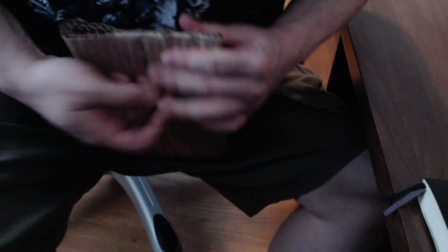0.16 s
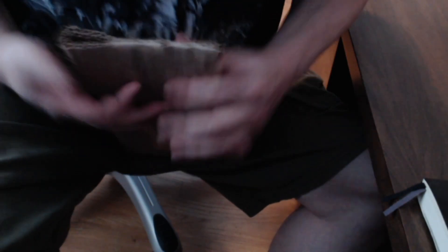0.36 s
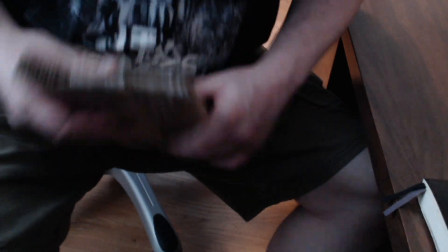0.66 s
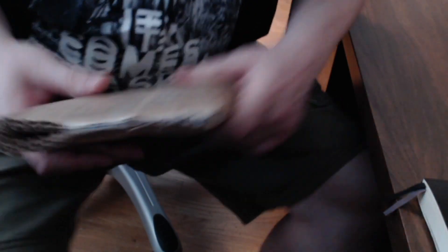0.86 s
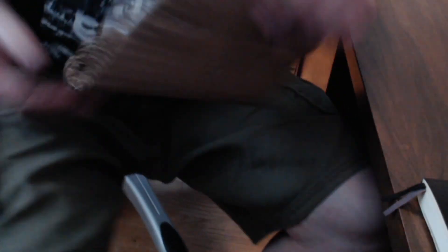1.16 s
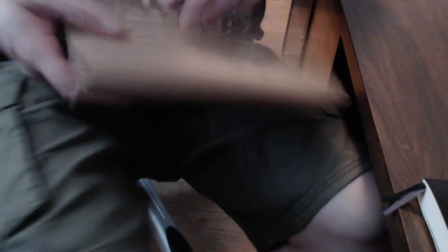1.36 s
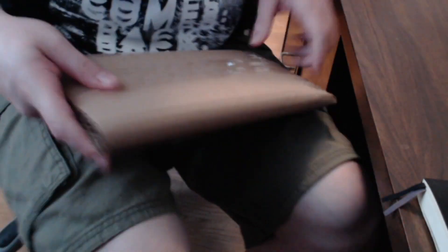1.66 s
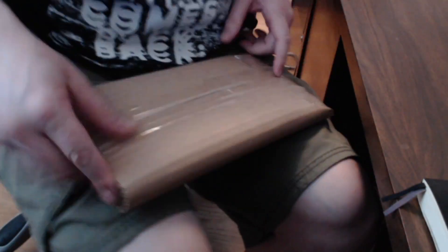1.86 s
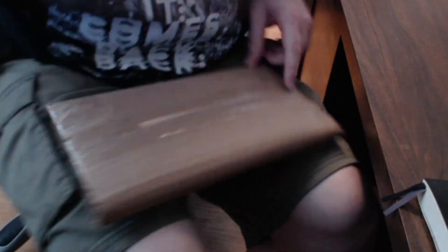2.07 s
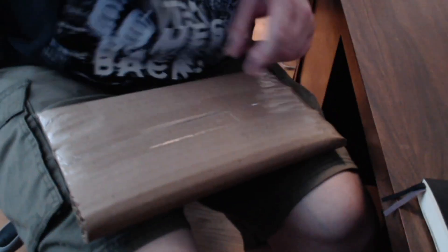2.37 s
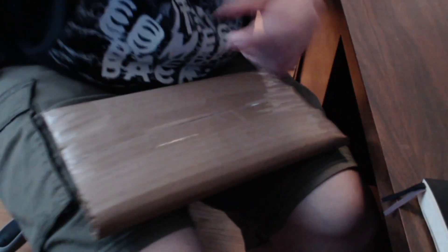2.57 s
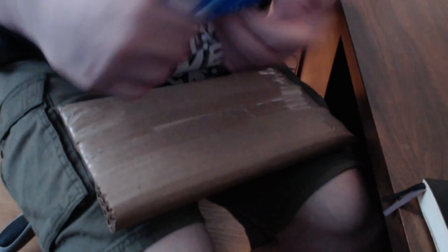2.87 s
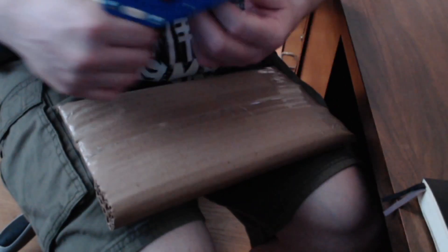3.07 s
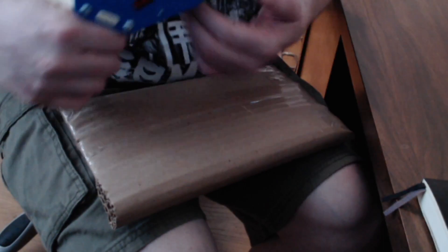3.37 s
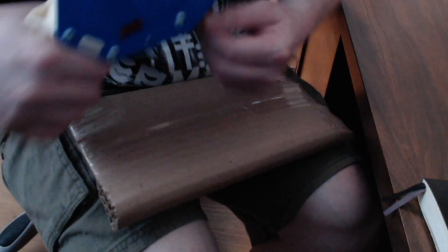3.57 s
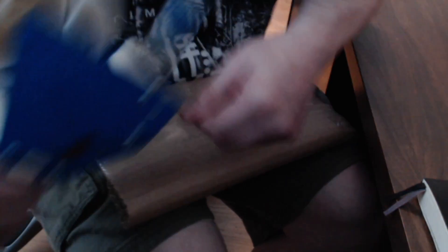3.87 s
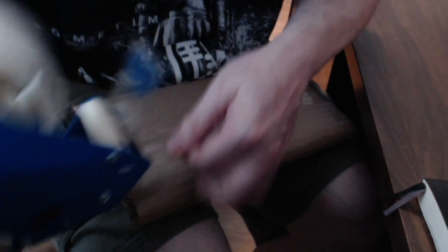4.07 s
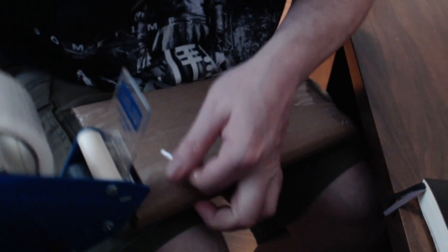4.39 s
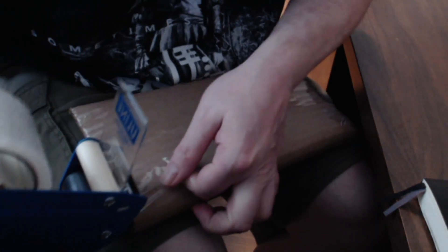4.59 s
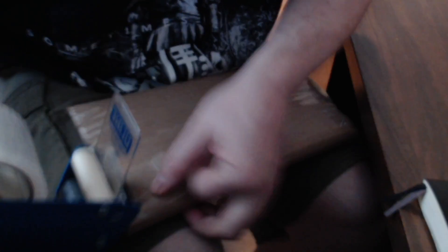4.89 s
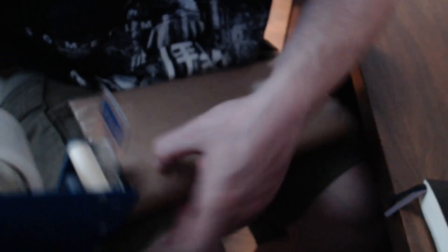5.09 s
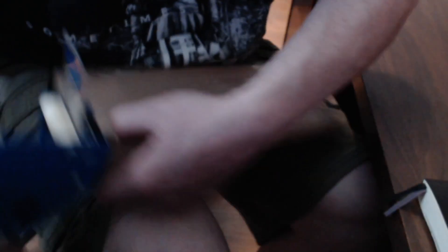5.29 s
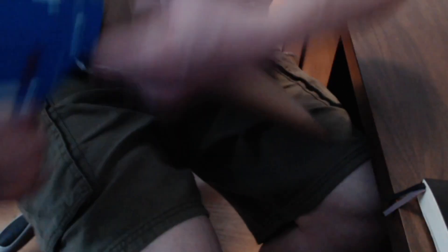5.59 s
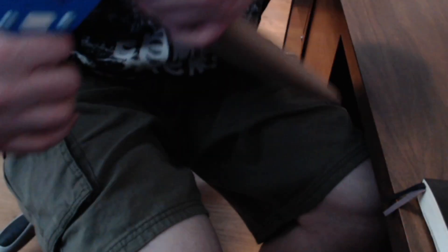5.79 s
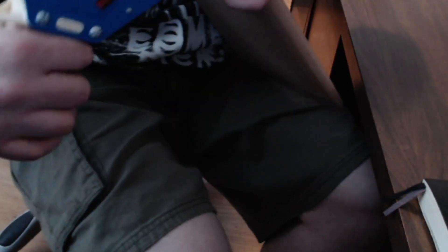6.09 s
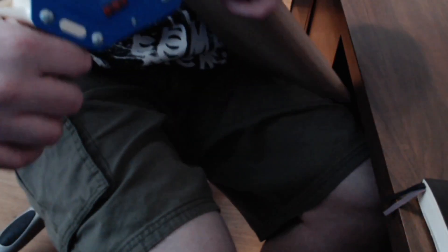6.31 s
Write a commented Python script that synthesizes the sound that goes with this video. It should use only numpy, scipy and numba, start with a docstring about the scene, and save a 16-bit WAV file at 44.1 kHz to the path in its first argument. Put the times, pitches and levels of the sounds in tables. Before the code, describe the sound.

Close indoor handling of corrugated card over a soft fan hum, with small plastic clicks, two harsh short tape pulls and a sharp metallic snap between.

```python
"""Packing tape is pulled twice off a tape gun, after a flat cardboard parcel is turned over on a lap.
The tape jerks loose (noise bursts) and screeches as fast, uneven slips ring the tape and gun.
After the first pull the tape snaps on the blade, where a blow rings the metal and the handle.
Hands rub (tiny clicks) and bump (soft pushes) the card, small parts click, and a fan hums (noise and tones).
The room adds echoes, and the close stereo microphone overloads."""
import sys
import numpy as np
from scipy import signal
from scipy.fft import rfft, irfft
from scipy.io import wavfile
from numba import njit

SR = 44100
rng = np.random.default_rng(int(sys.argv[2]) if len(sys.argv) > 2 else 0)


def to_wav(s):
    """Save 16-bit WAV."""
    ch = np.atleast_2d(s).T  # columns
    pcm = np.round(np.clip(ch, -1, 1) * 32767)  # PCM
    wavfile.write(sys.argv[1], SR, pcm.astype(np.int16))


N = 284445
T = np.arange(N) / SR  # time in seconds

# All levels in the tables are relative: the functions that use them also set overall levels.
# Airy noise of the fan. Each row: frequency in Hz, level in dB.
FAN_AIR = [(20, -28), (50, -10.5), (80, -10.5), (125, -7), (200, -1), (300, -7), (400, -9), (640, -14),
           (950, -17.5), (1600, -21), (3200, -28.5), (6000, -34), (10000, -41), (16000, -45)]
# Steady tones of the fan. Each row: frequency in Hz, level in dB.
FAN_TONES = [(120, -49.5), (179.5, -53), (314.3, -40.5), (360, -57), (629, -46), (943, -55.5)]
# Hands and cloth slide over the card. Each row: firmest moment in seconds, hiss in dB, scrape in dB,
# swelling time in seconds, fading time in seconds.
CARD_RUBS = [(.25, -32, -44.5, 0.12, 0.09), (.33, -25.5, -34.5, 0.02, 0.062),
             (.523, -39, -34.5, 0.012, 0.029), (.62, -38.5, -41.5, 0.055, 0.055),
             (.745, -39.5, -47, 0.011, 0.073), (.872, -42, -34.5, 0.042, 0.013),
             (1.23, -37, -38.5, 0.073, 0.13), (1.31, -40, -38, 0.04, .04),
             (1.45, -40.5, -41.5, 0.096, 0.084), (1.67, -33, -34, 0.048, 0.04),
             (1.82, -31, -34.5, 0.03, 0.022), (2.01, -40.5, -41, 0.057, 0.083), (4.22, -50, -45, .03, 0.11),
             (4.88, -33, -37, 0.041, 0.027), (4.97, -39.5, -38, 0.04, 0.14), (5.13, -40, -43, 0.081, 0.13),
             (5.201, -35, -30, 0.011, 0.04), (5.317, -40, -40, 0.0073, 0.032),
             (5.43, -40.5, -40, 0.11, 0.2)]
# Fingers work at the sticky film. Each row: the same columns as CARD_RUBS.
FILM_RUBS = [(2.745, -54, -41.5, 0.067, 0.041), (2.855, -40, -31.5, 0.0025, 0.051),
             (2.99, -42, -42, 0.0044, 0.071), (3.183, -26.5, -27, 0.051, 0.03),
             (3.416, -41, -36, 0.0022, 0.0077), (3.495, -43.5, -38, 0.032, 0.023),
             (3.632, -39.5, -37.5, 0.0099, 0.018), (3.72, -31.5, -35, 0.0041, 0.0064),
             (3.99, -37, -29, .025, 0.033), (4.03, -31.5, -34, .005, 0.039),
             (4.738, -50, -41.5, .002, 0.066), (4.817, -35, -34, 0.019, 0.0037),
             (6.085, -36.5, -26, 0.015, 0.032)]
# Bright part of rubbing, clicks and snaps. Each row: frequency in Hz, level in dB.
HISS_COLOUR = [(1200, -14), (2500, -1), (4500, 4.5), (7000, 3), (10500, 4), (13000, -5), (16000, -10)]
# Duller part of rubbing and clicks. Each row: frequency in Hz, level in dB.
SCRAPE_COLOUR = [(250, -12), (600, 2), (1000, 4.5), (2000, 2.5), (3800, 0.5), (6000, -4), (10000, -22.5)]
# The parcel is swung round. Each row: middle in seconds, time from there to 37 % in seconds, level in dB.
PARCEL_SWINGS = [(1.162, 0.17, -36.5), (5.2, .05, -47)]
# The parcel is bumped. Each row: start in seconds, level in dB, crunch in dB, boom in dB,
# left minus right in dB.
PARCEL_BUMPS = [(1.279, -24, -1, -10, 2), (1.309, -20, -9, -8, -1), (2.336, -25, -8.5, 6, -6),
                (2.391, -32.5, 5, -7, 7), (2.403, -8, -7.5, -6, -9.5), (2.42, -9.5, -6, -13, 0),
                (5.1121, -20.5, -2, -6, 0), (5.166, -32, 2, 0, 1)]
# Resonances of the parcel on the lap. Each row: frequency in Hz, width in Hz, level in dB.
PARCEL_RINGS = [(146.5, 10, 18.5), (183, 14, 2), (234, 13, 2), (283, 4.7, 12), (494, 60, -3),
                (586, 51, -11), (775, 54, -3)]
# Crunch of the crushed flutes. Each row: frequency in Hz, level in dB.
CRUNCH_COLOUR = [(240, -18), (450, 2.5), (1000, -8.5), (1350, -4), (1800, -7.5), (3000, -9.5), (4500, -18),
                 (6000, -27), (14000, -35.5)]
# Small clicks of film and plastic. Each row: start in seconds, level in dB, ring in Hz, treble in dB.
SMALL_CLICKS = [(1.3092, -22, 1620, -2), (1.337, -18.5, 3600, 7), (2.332, -28.5, 3160, -28),
                (2.4221, -12, 2840, -18), (2.7327, -23.5, 1600, -22), (2.75, -31.5, 2940, -20),
                (2.7647, -26, 2720, -25), (2.7953, -31.5, 2800, -20), (2.8285, -23.5, 2860, -32),
                (2.8543, -17.5, 4350, 8), (2.8763, -24, 2920, -21), (2.905, -23.5, 2050, 4),
                (2.9893, -23.5, 4400, -3), (3.127, -21, 1730, -19), (3.1507, -30, 1500, -1),
                (3.188, -16, 3600, -18), (3.242, -25, 3250, -3), (3.4145, -32, 2130, 5),
                (3.466, -31, 2540, 2), (3.493, -28.5, 2250, 5), (3.7153, -33, 1513, -15),
                (4.031, -17.5, 1620, 4), (4.0958, -27, 3500, -23), (4.188, -31, 1740, 20),
                (4.7016, -33.5, 3750, -32), (5.2003, -23, 3900, -18), (5.2492, -26, 2070, 0),
                (5.3125, -28, 1990, 9), (6.092, -28, 1500, -17)]
# The glue gives way in single jerks. Each row: start in seconds, level in dB, fading time in seconds,
# ring of the free tape in Hz.
TAPE_JERKS = [(3.7631, -6.5, 0.01, 2100), (3.7658, 5.5, 0.0013, 2120), (3.778, -2, 0.0064, 2090),
              (3.7934, -8, 0.0064, 2140), (5.7579, -8, 0.0084, 2510), (5.771, 5.5, 0.0042, 2450),
              (5.802, 9, 0.0032, 2700), (5.954, -3.5, 0.0084, 2130)]
# Resonances of the tape gun frame. Each row: frequency in Hz, width in Hz, level in dB.
GUN_RINGS = [(462, 37, -2), (793, 160, -7), (955, 91, -8), (1290, 560, -6.5), (1358, 78, -10),
             (1698, 440, -3), (1930, 210, -8), (3640, 1230, -6.5)]
# Crackle of the parting glue. Each row: frequency in Hz, level in dB.
GLUE_COLOUR = [(60, -8), (180, 8.5), (320, -28), (1200, 3), (2700, -15), (3200, -4.5), (4000, -3.5),
               (7000, -6.5), (10500, 2.5), (13000, -3), (16000, -36)]
# The arm draws tape off the roll. Each row: start in seconds, length in seconds, fastest moment in seconds
# after the start, speeding-up time in seconds, slowing-down time in seconds, top slips per second,
# level in dB, ring of the free tape at the start in Hz, ring of the roll in Hz, boom of the roll in dB,
# share of the tape drawn (0 to 1) when it booms most.
TAPE_PULLS = [(3.803, 0.18, .036, .12, .068, 850, 1, 2206, 324, -7.5, 0.61),
              (5.773, .191, .09, .12, .13, 880, 1.5, 2630, 470, 0, 0.73)]
# The taut tape breaks on the blade and the gun springs back. Each row: start in seconds, level in dB,
# main ring in Hz, handle in dB, bright crack in dB.
TAPE_SNAPS = [(4.8276, -4, 3740, -8.5, 3), (4.8308, -10.5, 5500, -29, 7), (4.9903, -5, 3250, -1, -11.5)]
# Resonances of the blade and guard. Each row: frequency in Hz, width in Hz, level in dB.
BLADE_RINGS = [(1320, 160, 12), (1850, 350, 11), (2270, 190, 0), (3080, 200, -9), (3740, 180, 5)]
# How sound dies away in the room. Each row: lowest frequency in Hz, highest frequency in Hz,
# time to fall by 60 dB in seconds, level in dB.
ROOM_BANDS = [(38.6, 330, 0.43, -2), (370, 1970, 0.26, 3.5), (1400, 4840, 0.31, -1.5),
              (4840, 8850, 0.26, 4.5), (9000, 21600, 0.23, 0)]


def amp(db):
    """Turn decibels into a gain."""
    return 10 ** (np.asarray(db) / 20)


def unit(x):
    """Scale to an average strength (rms) of 1."""
    return x / np.sqrt(np.mean(x ** 2) + 1e-18)


def noise():
    """White noise over the whole scene."""
    return rng.standard_normal(N)


def walk(rate):
    """Random values, rate of them a second, joined by straight lines."""
    return np.interp(T * rate, np.arange(N), noise())


def pan(db):
    """Left and right gains; db is left minus right."""
    return amp(np.array([[db], [-db]]) / 2)


def colour(x, points):
    """Filter through (Hz, dB) points without sounding early; white noise keeps its power."""
    hz, db = np.transpose(points)
    size = 4096
    bins_hz = np.arange(size + 1) * SR / (2 * size)
    gain = unit(amp(np.interp(np.log(bins_hz + 1), np.log(hz), db)))
    # folding the cepstrum makes the filter respond as early as it can
    cepstrum = irfft(np.log(gain))
    cepstrum[1:size] *= 2
    cepstrum[size + 1:] = 0
    response = irfft(np.exp(rfft(cepstrum)))
    return signal.fftconvolve(x, response)[:len(x)]


@njit
def svf(x, hz, width):
    """Let through a band around a centre that may move; the gain there is 1."""
    y, band, low = np.empty(len(x)), 0., 0.
    for i in range(len(x)):
        g, k = np.tan(np.pi * hz[i] / SR), width / hz[i]
        v = (band + g * (x[i] + 1e-18 - low)) / (1 + g * (g + k))
        band, low, y[i] = 2 * v - band, low + 2 * g * v, k * v
    return y


def ring(x, modes):
    """Ring resonances (Hz, width in Hz, dB) side by side; white noise keeps its power."""
    power = sum(amp(db) ** 2 * np.pi * width / SR for _, width, db in modes)
    total = sum(amp(db) * svf(x, hz + np.zeros(len(x)), float(width)) for hz, width, db in modes)
    return total / np.sqrt(power)


def burst(length, size=16384):
    """Noise that starts at once and falls to 37 % in length seconds."""
    return rng.standard_normal(size) * np.exp(-T[:size] / length)


def add(out, s, x):
    """Mix x into out from time s."""
    i = int(s * SR)
    out[..., i:i + x.shape[-1]] += x[..., :N - i]


def fan(air_db=-39, pan_db=-2.0, side_db=0, side_top_hz=3500):
    """Airy fan noise with slightly wavering tones, a little to the right, wider in its low part."""
    mid = unit(colour(noise(), FAN_AIR))
    low_pass = signal.butter(2, side_top_hz, fs=SR, output="sos")
    side = signal.sosfilt(low_pass, unit(colour(noise(), FAN_AIR)))
    air = amp(air_db) * (mid + amp(side_db) * side * np.array([[1], [-1]]))
    hum = np.zeros(N)
    for hz, db in FAN_TONES:
        level = amp(db + .6 * walk(6))
        cycles = np.cumsum(hz * (1 + .002 * walk(5))) / SR
        hum += level * np.sin(2 * np.pi * cycles)
    return (air + hum) * pan(pan_db)


def rubbing(strokes, grain_rate, scatter_db, smooth_db, hiss_db, scrape_db):
    """A surface catches and lets go in tiny clicks that hiss and scrape, swelling and fading each stroke."""
    shape = 0.99  # 1 = pressure builds and fades exponentially, 2 = as a bell
    hiss_power, scrape_power = np.zeros(N), np.zeros(N)
    for s, high_db, low_db, attack, release in strokes:
        distance = np.abs(T - s) / np.where(T < s, attack, release)
        pressure = np.exp(-np.minimum(distance, 20) ** shape)
        hiss_power += (amp(high_db) * pressure) ** 2
        scrape_power += (amp(low_db) * pressure) ** 2
    sizes = amp(scatter_db * np.minimum(rng.exponential(size=N), 5))
    catches = rng.random(N) < grain_rate / SR  # grain_rate clicks a second on average
    grains = unit(catches * sizes * np.sign(noise()))
    friction = unit(grains + amp(smooth_db) * noise())
    hiss = colour(friction * np.sqrt(hiss_power), HISS_COLOUR)
    scrape = colour(friction * np.sqrt(scrape_power), SCRAPE_COLOUR)
    return amp(hiss_db) * hiss + amp(scrape_db) * scrape


def sway(centre_hz=57, width_hz=24, pan_db=-5, apart_db=1):
    """Air pushed by the broad parcel rumbles, a little differently at each microphone port."""
    motion = sum(amp(db) * np.exp(-((T - s) / half) ** 2) for s, half, db in PARCEL_SWINGS)
    mode = [(centre_hz, width_hz, 0)]
    shared, left, right = (unit(ring(ring(noise(), mode), mode)) for _ in range(3))
    rumble = unit(shared + amp(apart_db) * np.array([left, right]))
    return motion * rumble * pan(pan_db)


def bumps(thud_db=26, boom_db=22, boom_hz=53, boom_width_hz=3.4):
    """A soft push rings the parcel and sets off a deep boom while the flutes crunch."""
    out = np.zeros((2, N))
    push_s, crunch_s = .0011, .011  # fading times
    for s, db, crunch_db, deep_db, pan_db in PARCEL_BUMPS:
        crunch = amp(crunch_db) * colour(burst(crunch_s), CRUNCH_COLOUR)
        push = np.exp(-T[:len(crunch)] / push_s) / (push_s * SR)
        thud = amp(thud_db) * ring(push, PARCEL_RINGS)
        boom = amp(boom_db + deep_db) * ring(push, [(boom_hz, boom_width_hz, 0)])
        add(out, s, amp(db) * pan(pan_db) * (thud + boom + crunch))
    return out


def clicks(width_hz=420, upper_ratio=1.61, upper_db=-7, body_db=-11, bright_db=-1, strength_db=-17):
    """Film creases flip and loose plastic parts touch, each with its own pair of short rings."""
    out = np.zeros(N)
    for s, db, hz, treble_db in SMALL_CLICKS:
        touch = burst(.0018, size=2048)
        rings = ring(touch, [(hz, width_hz, 0), (hz * upper_ratio, 2 * width_hz, upper_db)])
        body = amp(body_db) * unit(colour(touch, SCRAPE_COLOUR))
        treble = amp(treble_db + bright_db) * unit(colour(touch, HISS_COLOUR))
        add(out, s, amp(db + strength_db) * unit(unit(rings) + body + treble))
    return out


def tape_body(slips, span_hz, span_width_hz=700, span_db=-3, frame_db=-4, glue_db=-8):
    """Each slip rings the free length of tape and the gun, over the crackle of the glue."""
    # two band filters in a row give the ring of the tape steep flanks
    span = ring(slips, [(span_hz, span_width_hz, 0)])
    span = svf(span, span_hz + np.zeros(len(slips)), 2. * span_width_hz)
    frame = ring(slips, GUN_RINGS)
    glue = colour(slips, GLUE_COLOUR)
    return amp(span_db) * span + amp(frame_db) * frame + amp(glue_db) * glue


def jerks():
    """Around the start of each pull, and late in the second, the tape comes loose in short tugs (noise bursts)."""
    out = np.zeros(N)
    for s, db, length, hz in TAPE_JERKS:
        add(out, s, amp(db) * tape_body(burst(length), hz))
    return out


def pull(roll_width_hz=87, jitter=.35, scatter_db=3.0, fizz_db=-5, fizz_share=0.51):
    """Tape peels in uneven slips with a fizz of breaking glue threads; speed sets their rate and strength."""
    speed_power = 2.65  # the strength of the slips grows as this power of the speed
    slips_to_halve = 500  # the free tape lengthens: after this many slips its ring is half as high
    boom_spread, boom_rest_db = 0.14, -13  # share of the pull the boom spans; its level for the rest
    out = np.zeros(N)
    for s, length, fastest, rise, fall, top_rate, db, start_hz, roll_hz, boom_db, boom_share in TAPE_PULLS:
        t = T - s - fastest
        speed = np.exp(-(t / np.where(t < 0, rise, fall)) ** 2) * (T > s) * (T < s + length)
        rate = top_rate * speed
        drawn = np.cumsum(rate) / SR  # tape drawn, counted in even slips
        phase = np.cumsum(rate * np.exp(jitter * walk(500))) / SR
        # a slip happens whenever the phase passes a whole number
        sizes = unit(amp(scatter_db * noise()))
        slips = np.diff(np.floor(phase), prepend=0) * sizes * np.sqrt(SR / (rate + 1))
        fizz = noise() * np.exp(-(phase % 1) / fizz_share) * np.sqrt(2 / fizz_share)
        # the glue grips in patches, so the pull surges every few milliseconds
        surge = unit(amp(3 * walk(220)))
        drive = (slips + amp(fizz_db) * fizz) * surge * amp(db) * speed ** speed_power
        boom = amp(boom_rest_db) + np.exp(-((drawn / drawn[-1] - boom_share) / boom_spread) ** 2)
        out += tape_body(drive, start_hz / (1 + drawn / slips_to_halve))
        out += amp(boom_db) * ring(drive * boom, [(roll_hz, roll_width_hz, 0)])
    return out


def snaps(blow_db=14, crack_s=0.0022, width_hz=800, main_db=-5, blade_db=-3,
          low_hz=530, low_width_hz=190, flutter_s=0.009, flutter_db=-21):
    """One blow rings the blade and the hollow handle; the parting film cracks and flutters on."""
    out = np.zeros(N)
    for s, db, hz, handle_db, crack_db in TAPE_SNAPS:
        crack = burst(crack_s) + amp(flutter_db) * burst(flutter_s)
        blow = amp(blow_db) * signal.unit_impulse(len(crack)) + amp(flutter_db) * burst(flutter_s)
        metal = amp(main_db) * ring(blow, [(hz, width_hz, 0)]) + amp(blade_db) * ring(blow, BLADE_RINGS)
        handle = amp(handle_db) * ring(blow, [(low_hz, low_width_hz, 0)])
        film = amp(crack_db) * colour(crack, HISS_COLOUR)
        add(out, s, amp(db) * (metal + handle + film))
    return out


def room(x, early_db=-8, early_s=0.0082, tail_db=-10):
    """Desk and body reflect at once, the walls ring on; each port hears its own reflections."""
    t = T[:SR * 2 // 3]
    tail = np.zeros((2, len(t)))
    for lo, hi, t60, db in ROOM_BANDS:
        band_pass = signal.butter(3, [lo, min(hi, .45 * SR)], "band", fs=SR, output="sos")
        band = signal.sosfilt(band_pass, rng.standard_normal(tail.shape))
        tail += amp(db - 60 * t / t60) * band
    tail = unit(tail * np.clip(t / 0.017, 0, 1))  # the tail fades in over 17 ms
    # the ports are close together: their first reflections differ more in the treble
    mid, side = rng.standard_normal(tail.shape)
    side = side - 0.21 * signal.sosfilt(signal.butter(1, 2500, fs=SR, output="sos"), side)
    early = (mid + side * np.array([[1], [-1]])) * np.exp(-t / early_s) * (t > .001)
    response = (amp(tail_db) * tail + amp(early_db) * unit(early)) / np.sqrt(len(t))
    return x + signal.fftconvolve(x, response, axes=1)[:, :N]


def ports(x, lag_share):
    """A near sound reaches the right port a fraction of a sample (lag_share) before the left."""
    left = x + lag_share * (np.roll(x, 1) - x)
    return np.array([left, x])


def scene():
    """The tape gun works a little to one side, the hands slide over the parcel near the middle."""
    card = rubbing(CARD_RUBS, grain_rate=5000, scatter_db=5.0, smooth_db=3, hiss_db=-1, scrape_db=-0.5)
    film = rubbing(FILM_RUBS, grain_rate=1800, scatter_db=4.0, smooth_db=0.0, hiss_db=-0.5, scrape_db=-2.5)
    tape_gun = clicks() + film + jerks() + pull() + snaps()
    near = ports(tape_gun, lag_share=0.67) + ports(card, lag_share=0.079)
    return fan() + sway() + room(near + bumps())


def record(dry, ceiling=0.91, top_hz=15650):
    """The microphone rounds off peaks near its ceiling, and the sound above top_hz is cut."""
    clipped = dry / (1 + (dry / ceiling) ** 8) ** (1 / 8)
    top_cut = signal.ellip(12, .2, 70, top_hz, fs=SR, output="sos")
    return signal.sosfilt(top_cut, clipped)


dry = scene()
out = record(dry)
to_wav(out)
```